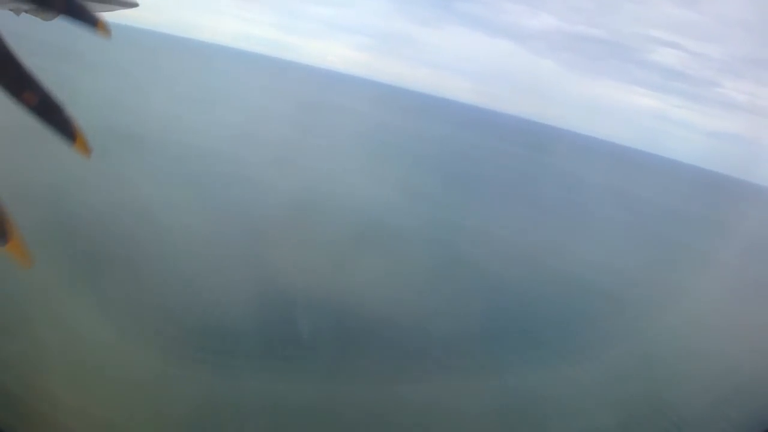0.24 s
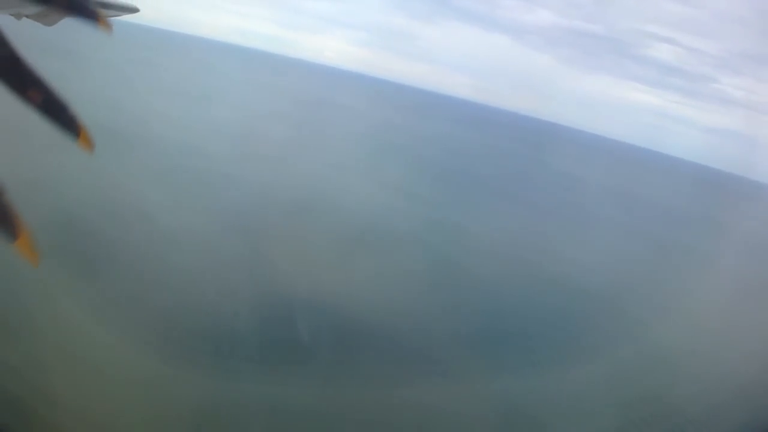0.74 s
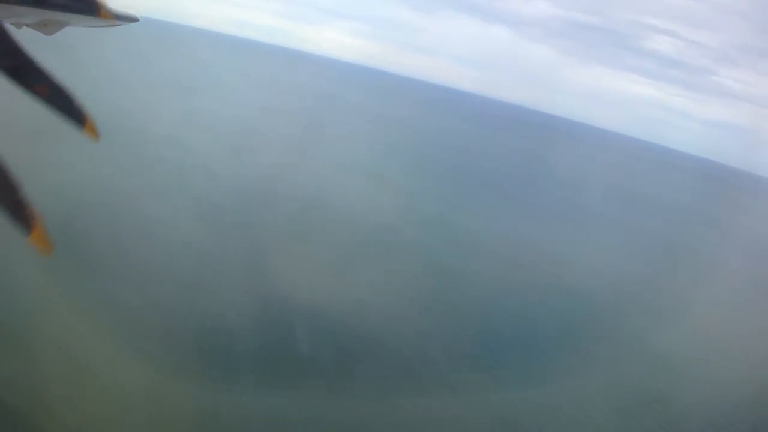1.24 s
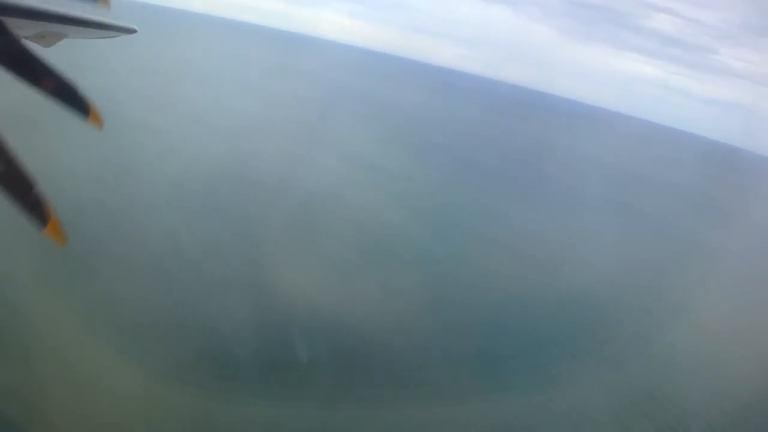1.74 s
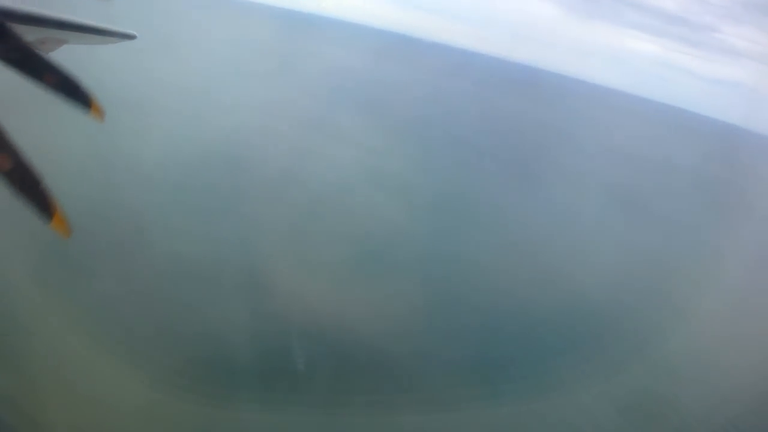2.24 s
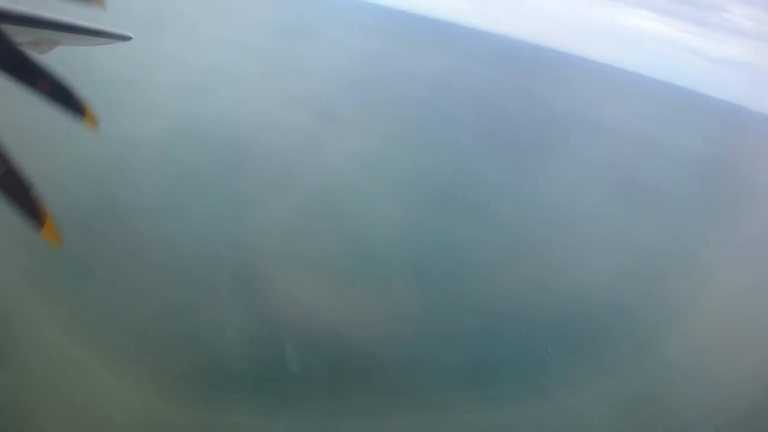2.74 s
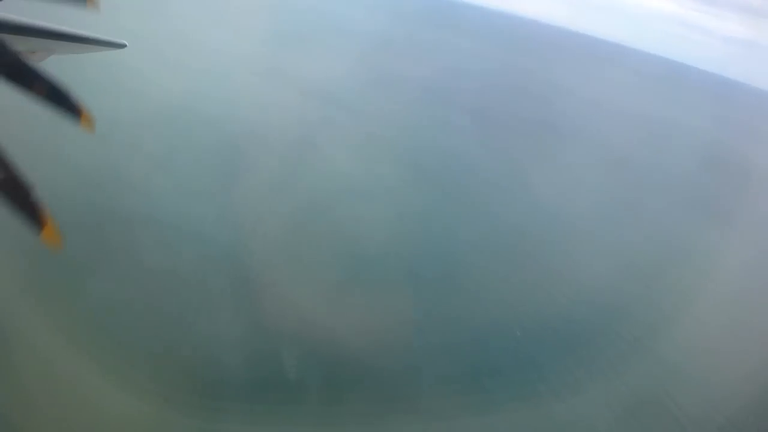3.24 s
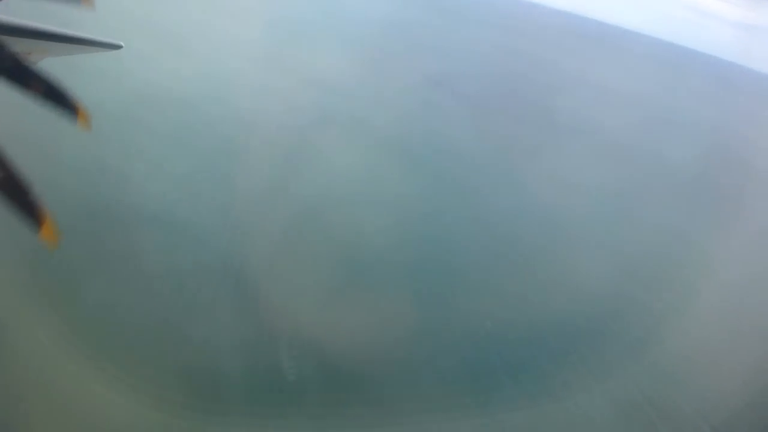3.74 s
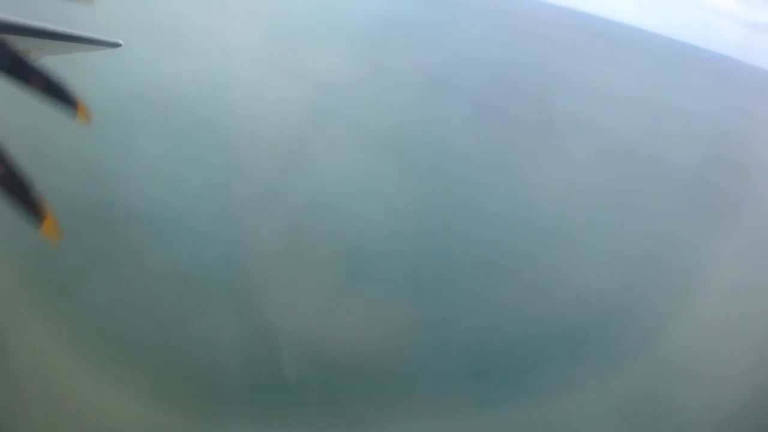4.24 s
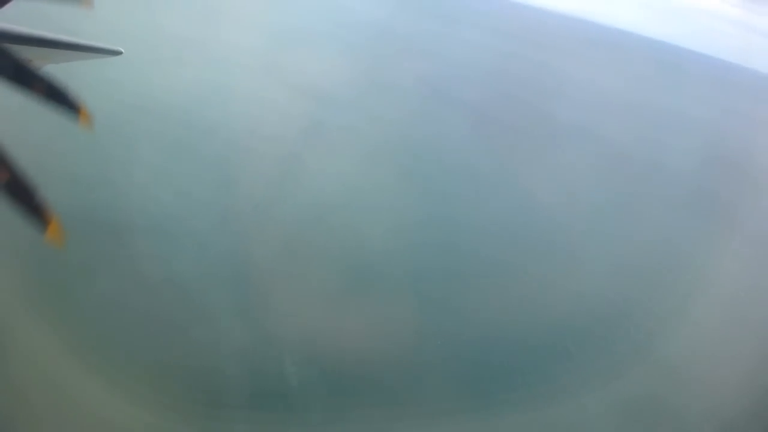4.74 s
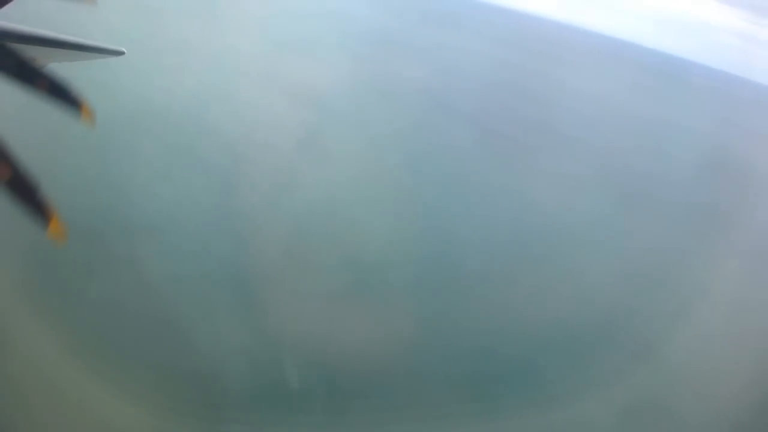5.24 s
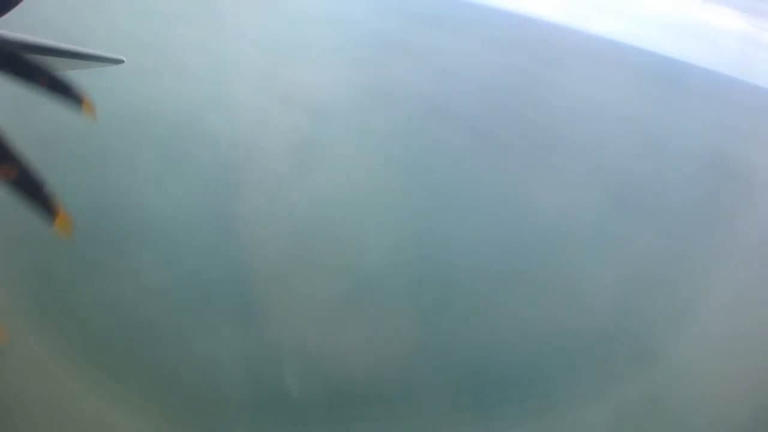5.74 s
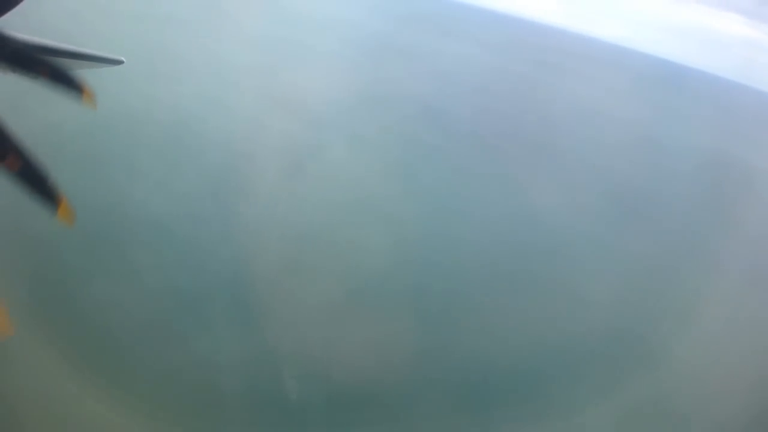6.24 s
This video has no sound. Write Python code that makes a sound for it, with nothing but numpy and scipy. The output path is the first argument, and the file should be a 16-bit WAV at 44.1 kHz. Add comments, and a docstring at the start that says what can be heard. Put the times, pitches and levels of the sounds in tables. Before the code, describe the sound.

A loud, low propeller drone fills an airliner cabin, with rushing air, a thin turbine whine and faintly buzzing trim.

```python
"""Inside a climbing turboprop airliner, at a window just behind the propeller.
From the start, air roars along the skin, two turbines whine in and out of step, and the blades
beat on the fuselage 120 times a second, making a drone and setting a piece of trim buzzing.
Between 2.5 and 3 s the drone eases, and the buzz and the airflow with it. It has recovered
by 3.7 s, when the far whine is weakest, and stays strong until a slight dip near 6 s."""
import sys
import numpy as np
from scipy import signal
from scipy.fft import rfft, irfft
from scipy.io import wavfile

SR = 44100
rng = np.random.default_rng(int(sys.argv[2]) if len(sys.argv) > 2 else 0)


def generate_wav(sig):
    """Save sig (samples, or channels by samples) to the path in sys.argv[1] as 16-bit PCM at SR."""
    pcm = np.round(np.clip(np.atleast_2d(sig).T, -1, 1) * 32767).astype(np.int16)
    wavfile.write(sys.argv[1], SR, pcm)


N = 285768
TIME = np.arange(N) / SR
BINS = np.fft.rfftfreq(N, 1 / SR)

# base spectra of the shell's roar and the air's hiss: (frequency [Hz], spectral density [dB per Hz])
ROAR_SPECTRUM = [(15, -100), (35, -94), (50, -84), (64, -76.5), (95, -70), (130, -62.5), (260, -58.5),
                 (410, -60.5), (520, -70), (640, -73), (900, -73.5), (1150, -84.5), (2000, -105),
                 (5000, -140)]
HISS_SPECTRUM = [(300, -93.5), (1100, -80), (1700, -82.5), (2300, -83.5), (2700, -86.5), (3300, -88.5),
                 (3900, -92), (5100, -97), (6200, -94), (7700, -100.3), (10000, -100), (10900, -105)]
# resonances of the cabin: (frequency [Hz], width [Hz], gain [dB])
CABIN_MODES = [(151, 15, -0.5), (317.4, 13, -5), (341.7, 32, 3), (377, 45, -1.5), (424, 14, 0.5),
               (654, 47, -3.5), (750, 61, -0.5), (948, 110, 3), (1040, 91, -2.5), (1350, 70, 2),
               (3160, 160, 6), (3600, 120, 2)]

# how far the far turbine runs below the near one: (time [s], beat frequency [Hz])
BEAT_RATE = [(0.0, 4.0), (1.01, 3.8), (1.35, 3.03), (1.96, 5.04), (2.6, 3.06), (4.14, 3.28), (4.44, 4.36),
             (5.27, 2.08), (6.5, 4.43)]
# how strongly the far whine comes through: (time [s], gain [dB])
FAR_WHINE_GAIN = [(0, -0.5), (2.4, -0.5), (3.7, -6), (4.8, -1), (5.4, -3), (6.5, -4)]
# sidebands of the whines: (offset [blade rates])
SIDEBAND_ORDERS = [-6, -4, -3, -2, -1, 0, 1, 2, 3, 10, 12, 14, 15, 16]
# their base levels: (near engine [dB], far engine [dB])
SIDEBAND_LEVELS = [(-77, -84), (-74.5, -82), (-67.5, -80), (-71.5, -71), (-80, -81.5), (-75.5, -64),
                   (-83, -73.5), (-78, -85.5), (-76.5, -86.5), (-93, -81.5), (-88, -89), (-89.5, -94),
                   (-87, -88.5), (-86.5, -88)]
TURBINE_HZ, FIRST_IN_STEP_S = 6950.4, .12
GEAR_HZ, GEAR_DB = 2374, -66.5

# modes of the trim: (frequency [Hz], time constant [s], base level [dB], place of the tap [cycles])
TRIM_MODES = [(4350, 0.00068, -63.5, 0.6), (3720, 0.00083, -75.5, .64)]

# blade-passing frequency: (time [s], frequency [Hz])
BLADE_RATE = [(0, 119.9), (.5, 119.95), (1, 120.12), (2, 120.15), (3, 119.8), (3.5, 119.94), (4.5, 119.87),
              (5.5, 120.07), (6.5, 120.07)]
# how hard the blades beat on the wall, taken relative to its mean: (time [s], level [dB])
DRONE_LEVEL = [(0, -24), (0.15, -21.5), (1.88, -21.5), (2.09, -20.5), (2.55, -23), (2.96, -23.5),
               (3.5, -21.1), (4.7, -21), (5.05, -20.5), (5.35, -21.0), (6.05, -22), (6.28, -21),
               (6.48, -21)]
# middle blade harmonics: (order [blade rates])
MIDDLE_ORDERS = [3, 4, 5, 7]
# their levels: (base level at mid-scene [dB], trend [dB/s])
MIDDLE_LEVELS = [(-51, -1), (-48.5, -0.86), (-53, -0.7), (-56.5, 0.2)]
# their swells and dips: (centre time [s], order [blade rates], length [s], change [dB])
MIDDLE_SWELLS = [(1.3, 3, 0.45, 5.5), (1.5, 7, 0.64, -13), (1.95, 3, 0.44, -3), (2.3, 4, .9, 4.5),
                 (2.85, 7, .6, 4), (2.87, 5, 0.54, -24), (3.4, 3, 0.84, -9), (3.6, 7, .7, -4),
                 (3.85, 5, 1.1, 3.5), (4.95, 3, .5, -12.5), (5.9, 4, 0.31, -10)]
# fainter blade harmonics: (order [blade rates])
FAINT_ORDERS = [6, 8, 9, 10, 17, 18, 19]
# their levels: (rms level [dB])
FAINT_LEVELS = [-59.5, -69.5, -62.5, -67, -68.5, -67, -72]
# the blade tone and its octave; every "follow" is in dB per dB of drone
BLADE_DB, BLADE_FOLLOW = -23.4, 0.94
OCTAVE_DB, OCTAVE_FOLLOW = -26.5, 1.3


def amp(db):
    """Amplitude grows tenfold for every 20 dB."""
    return 10 ** (np.asarray(db) / 20)


def unit(x):
    """Normalisation to an rms of one."""
    return x / np.sqrt(np.mean(abs(x) ** 2) + 1e-20)


def curve(rows):
    """Linear interpolation in time."""
    return np.interp(TIME, *np.transpose(rows))


def spectrum(points):
    """Level in dB at every bin, interpolated on a logarithmic frequency axis."""
    hz, db = np.transpose(points)
    return np.interp(np.log(BINS + 1), np.log(hz + 1), db)


def noise(gain):
    """White noise filtered to the given amplitude per root hertz."""
    return irfft(rfft(rng.standard_normal(N)) * gain, N) * np.sqrt(SR / 2)


def band(hz, width):
    """A resonance selects a narrow band of noise, here of unit rms."""
    return unit(noise(1 / (1 + ((BINS - hz) / (.5 * width)) ** 2 / 2)))


def drift(rate_hz, size=2048):
    """Random modulation: noise of unit rms, low-passed at about rate_hz."""
    hz = np.fft.rfftfreq(size, 2 * TIME[-1] / size)
    slow = irfft(rfft(rng.standard_normal(size)) * np.exp(-(hz / rate_hz) ** 2))
    slow = np.interp(TIME, np.linspace(0, 2 * TIME[-1], size), slow)
    return unit(slow - slow.mean())


def load_db():
    """Common modulation: the drone's level above its mean, which other sources follow."""
    db = curve(DRONE_LEVEL)
    return db - db.mean()


def airflow(roar_follow=.25, hiss_follow=0.37, gust_db=0.5):
    """Turbulence along the skin excites the cabin's resonances as a roar and hisses above them."""
    colour_db = sum(db / (1 + ((BINS - hz) / (.5 * width)) ** 2) for hz, width, db in CABIN_MODES)
    roar = noise(amp(spectrum(ROAR_SPECTRUM) + colour_db))
    roar *= amp(roar_follow * load_db() + gust_db * drift(13))
    hiss = noise(amp(spectrum(HISS_SPECTRUM)))
    hiss *= amp(hiss_follow * load_db() + gust_db * drift(17))
    return roar + hiss


def beat_angle():
    """Phase difference: the far whine slips behind the near one by one cycle per beat."""
    beats = np.cumsum(curve(BEAT_RATE)) / SR
    return 2 * np.pi * (beats - np.interp(FIRST_IN_STEP_S, TIME, beats))


def intake(passes, level_db=-62.5, swing_db=1.0, throb_db=-0.6, depth=0.23, follow=0.68):
    """Amplitude modulation: the whines' noisy skirt throbs with their beat and pulses with the blades."""
    pulse = 1 + depth * np.cos(2 * np.pi * (passes - .22))
    surge_db = throb_db * amp(curve(FAR_WHINE_GAIN)) * np.cos(beat_angle()) + swing_db * drift(6.4)
    return amp(level_db + follow * load_db() + surge_db) * band(hz=6730, width=660) * pulse


def turbines(passes, wander_hz=0.94, shimmer=0.46):
    """Two close whines beat by interference; the blades chop them into sidebands. A gear sings below."""
    near = np.exp(2j * np.pi * np.cumsum(TURBINE_HZ + wander_hz * drift(1)) / SR)
    slip = amp(curve(FAR_WHINE_GAIN)) * np.exp(-1j * beat_angle())
    steady_passes = np.linspace(0, passes[-1], N)
    whines = np.zeros(N)
    for order, (near_db, far_db) in zip(SIDEBAND_ORDERS, SIDEBAND_LEVELS):
        chop = np.exp(2j * np.pi * (order * steady_passes + rng.random()))
        path = 1 + shimmer * (drift(21) + 1j * drift(21)) / np.sqrt(2)  # turbulent air on the way
        whines += (near * chop * path * (amp(near_db) + amp(far_db) * slip)).real
    gear_mesh = amp(GEAR_DB) * np.cos(2 * np.pi * np.cumsum(GEAR_HZ + 6 * drift(8.2)) / SR)
    return np.sqrt(2) * (whines + gear_mesh)


def trim_buzz(passes, follow=.8, jitter_s=.00009, swing_db=1.7):
    """Impacts excite damped modes: loose trim taps once a blade pass, harder when the drone swells."""
    push_db = follow * load_db() + swing_db * drift(11)
    cycles = np.arange(int(passes[-1]) - 1)
    t, out = TIME[:SR // 100], np.zeros(N)
    for hz, decay_s, db, place in TRIM_MODES:
        tap_s = np.interp(cycles + place, passes, TIME) + jitter_s * rng.standard_normal(len(cycles))
        force = rng.uniform(.75, 1.25, len(cycles))
        taps = np.zeros(N)
        taps[np.clip((tap_s * SR).astype(int), 0, N - 1)] = force
        mode = t * np.exp(-t / decay_s) * np.sin(2 * np.pi * hz * t)
        out += amp(db + push_db) * unit(signal.oaconvolve(taps, mode)[:N])
    return out


def swell_db(order):
    """Gaussian envelopes in dB make one harmonic swell or fade, and return."""
    return sum(db * np.exp(-(2 * (TIME - centre) / length) ** 2)
               for centre, harmonic, length, db in MIDDLE_SWELLS if harmonic == order)


def propeller(passes, flutter_db=0.37, octave_flutter_db=0.46, waver_db=1.5, gust_hz=1.1, unsteady=0.55):
    """Periodic blade pressure forms a harmonic series; uneven inflow makes it flutter and fade."""
    angle = 2 * np.pi * passes - np.pi / 2
    out = amp(BLADE_DB + BLADE_FOLLOW * load_db() + flutter_db * drift(13)) * np.sin(angle)
    out += amp(OCTAVE_DB + OCTAVE_FOLLOW * load_db() + octave_flutter_db * drift(9)) * np.sin(2 * angle)
    for order, (db, trend) in zip(MIDDLE_ORDERS, MIDDLE_LEVELS):
        level_db = db + trend * (TIME - TIME.mean()) + swell_db(order) + waver_db * drift(5.3)
        out += amp(level_db) * np.sin(order * angle)
    for order, db in zip(FAINT_ORDERS, FAINT_LEVELS):
        # a steady phasor plus a random one that carries the unsteady share of the power
        sway = np.sqrt(1 - unsteady) + np.sqrt(unsteady / 2) * (drift(gust_hz) + 1j * drift(gust_hz))
        out += amp(db) * (unit(sway) * np.exp(1j * order * angle)).imag
    return -np.sqrt(2) * out


def scene():
    """Superposition of the sources; all that the blades drive shares one count of blade passes."""
    passes = np.cumsum(curve(BLADE_RATE)) / SR
    return (propeller(passes) + trim_buzz(passes) + turbines(passes) + intake(passes) + airflow())[None]


def record(dry, cutoff_hz=11030):
    """Band limiting: a low-pass filter removes the highest treble."""
    lowpass = signal.firwin(1023, cutoff_hz, window=("kaiser", 9), fs=SR)
    return signal.oaconvolve(dry, lowpass[None], "same")


dry = scene()
out = record(dry)
generate_wav(out)
```